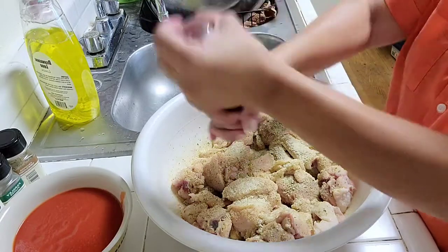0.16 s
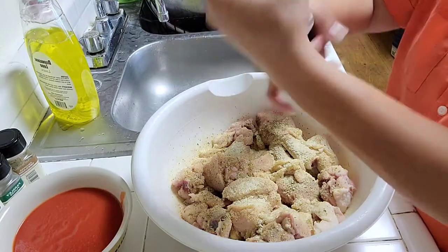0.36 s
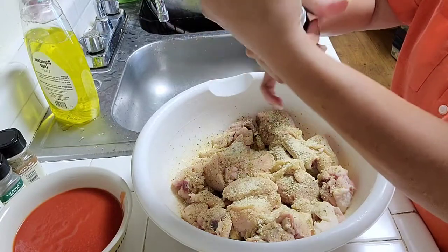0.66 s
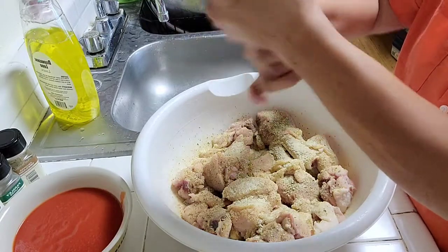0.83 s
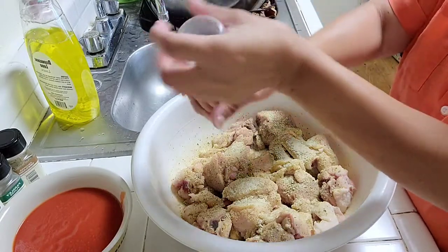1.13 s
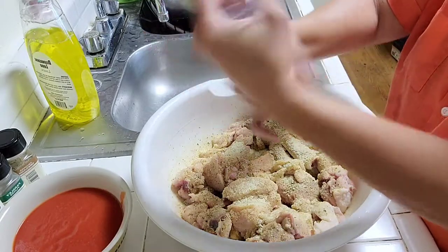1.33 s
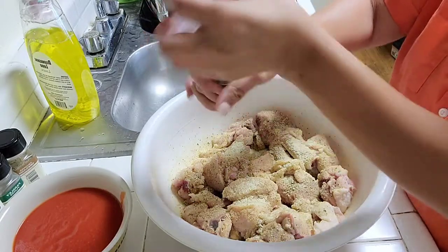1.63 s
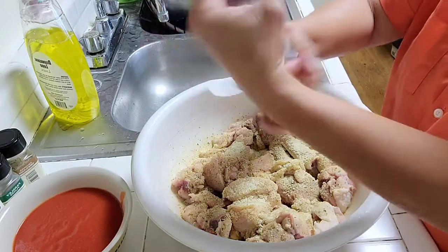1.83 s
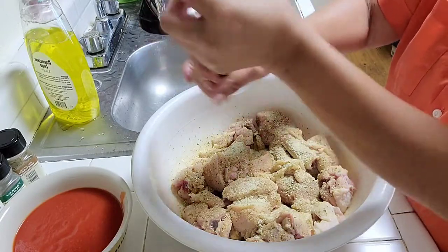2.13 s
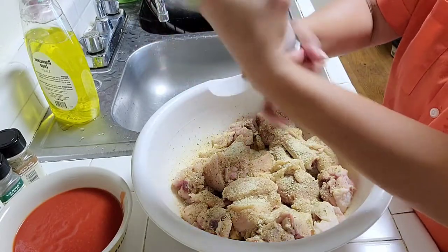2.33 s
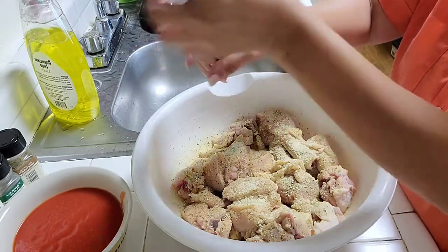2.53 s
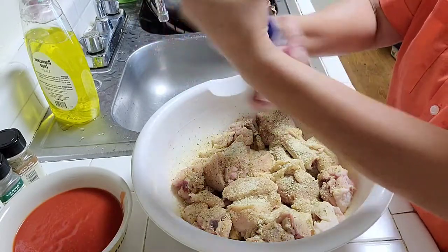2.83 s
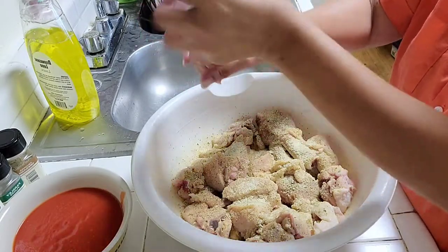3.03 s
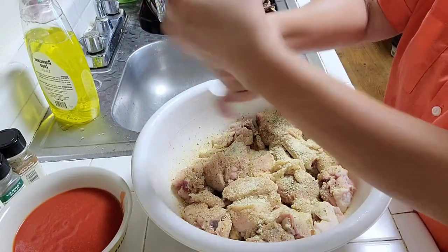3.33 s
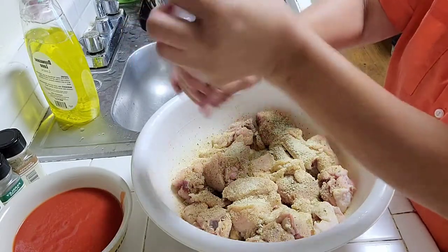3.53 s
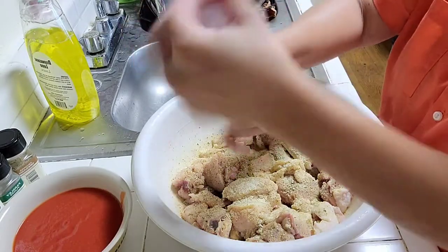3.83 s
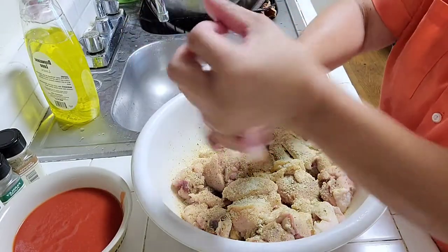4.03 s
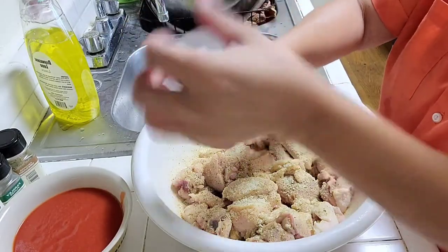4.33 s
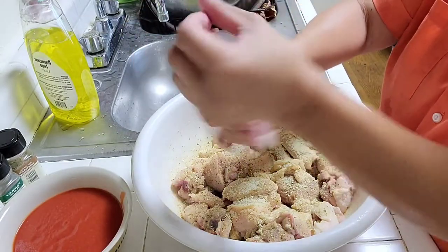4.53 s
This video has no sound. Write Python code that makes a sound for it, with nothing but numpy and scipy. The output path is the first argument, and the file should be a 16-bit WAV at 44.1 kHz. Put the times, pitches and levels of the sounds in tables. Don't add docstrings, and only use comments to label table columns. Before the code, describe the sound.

A palm taps an upturned plastic spice jar twice, then shakes it briskly, dry powder rattling and hissing over a faint fridge hum.

```python
import sys
import numpy as np
from scipy import signal
from scipy.fft import rfft, irfft, next_fast_len
from scipy.io import wavfile
from scipy.ndimage import uniform_filter1d

SR = 44100
rng = np.random.default_rng(int(sys.argv[2]) if len(sys.argv) > 2 else 0)


def volts_from_db(level):
    exponent = np.asarray(level, float) / 20
    return 10 ** exponent


def to_wav(s):
    ch = np.atleast_2d(s).T
    pcm = np.round(np.clip(ch, -1, 1) * 32767)
    wavfile.write(sys.argv[1], SR, pcm.astype(np.int16))


N = 205933

# f/Hz, level/dB
COMPRESSOR_LINES = [(59.5, -60), (119.1, -53), (238.8, -79.5)]
# f/Hz, width/Hz, level/dB
CABINET_MODES = [(28, 14, -81), (42, 33, -59), (62, 37, -55), (102.14, 8.1, -52.5), (110.3, 6.9, -57.5),
                 (120.23, 5.7, -63.5), (355, 34, -75), (420, 24, -78.5)]
# f/Hz, density/dB
AIR_SPECTRUM = [(82, -8), (140, -9.5), (171, -20), (254, -18.5), (1530, -28.5), (2890, -31), (5240, -46),
                (15000, -47)]
# t/s, peak/dB, f/Hz, t60/s
PALM_THUDS = [
    (0.131, -46.5, 258, 0.084),
    (0.984, -54, 282, 0.072),
    (2.244, -59, 200, 0.033),
    (2.44, -54.5, 535, 0.061),
    (2.728, -35, 355, 0.031),
    (3.364, -50, 350, 0.09),
    (3.615, -56, 633, 0.087),
    (4.092, -59, 250, 0.063),
    (4.302, -42.5, 230, 0.025),
]
# t/s, peak/dB, f/Hz
PALM_SLAPS = [(0.13, -24, 3350), (0.9823, 1, 4720), (1.3054, -15, 4700), (1.502, -24, 3000),
              (1.8229, -7.5, 3080), (1.9844, -38, 4070), (2.2428, -17, 3200), (2.4399, -18, 3300),
              (2.69, -19, 3980), (2.7606, -30, 4120), (2.8981, -11.5, 1980), (3.1684, -14.5, 1930),
              (3.2327, -8.5, 4790), (3.2531, -9, 1845), (3.3603, -18.5, 2000), (3.5099, -32, 7040),
              (3.62, -9, 3120), (3.8387, -80, 3000), (4.003, -15, 7200), (4.0967, -7, 3210),
              (4.1646, -7.5, 4000), (4.3061, -10, 1740), (4.4648, -33, 6360), (4.5819, -17, 1790),
              (4.612, -25, 3360)]
# t/s, flow/dB
SLIDE_FLOW = [(0.0, -67), (0.19, -76), (0.31, -66.5), (0.5, -74), (0.601, -86.5), (0.831, -78.5),
              (0.97, -78), (1.09, -58), (1.2, -70.5), (1.27, -59.5), (1.5, -54.5), (1.75, -52.5),
              (2.0, -52), (2.7, -49.5), (3.03, -52.5), (3.15, -48.5), (3.5, -50.5), (4.67, -50.5)]
# level/dB, swing/dB, loudest/share of shake
COARSE_SWELL = [(0.54, 5.5, 0.11), (-10, 13, 0.14)]
# level/dB, swing/dB, loudest/share of shake
FINE_SWELL = [(-0.7, 2.3, 1), (-3, 1.3, 0.48)]
# t/s, wall peak/dB, body re wall/dB, grit peak/dB, dust re grit/dB
TAP_SHOWERS = [(0.078, -75, -17, -49, 10), (0.11, -35.5, -18, -36, -3), (0.128, -13, -9.5, -19.5, -3),
               (0.138, -19, -24, -18, -0.5), (0.535, -66, -12, -59, -4), (0.85, -64, -12, -61, -4),
               (0.907, -51, -25, -42, 1), (0.9786, -13.5, -7, -16, -8), (0.9945, -14.5, -12, -20.5, -9),
               (1.093, -36.5, -25, -32.5, -19), (1.255, -32, -10, -33, -8)]
# t/s, wall peak/dB, body re wall/dB, grit peak/dB, dust re grit/dB
HEAP_LANDINGS = [(1.3023, -23.5, -11.5, -23, 1), (1.498, -28, -10.5, -35, -21),
                 (1.817, -24.5, -6, -30, -17), (1.9796, -26, -12, -36.5, -19),
                 (2.2397, -22, -7.5, -25.5, 1.5), (2.4378, -19.5, -6.5, -25, -5.5),
                 (2.6866, -17.5, -6, -20, 2.5), (2.701, -44, 8, -47, -14), (2.757, -19.5, -4.5, -23, -2.5),
                 (2.8933, -24, -6.5, -32, -18), (3.107, -31, -9, -31.5, -3), (3.161, -28, -7, -28.5, -11),
                 (3.2295, -20, -8.5, -28, -1), (3.357, -29, -2.5, -34.5, -20),
                 (3.6153, -22, -2.5, -22.5, 2), (3.628, -45, -12, -34, -16), (3.697, -27.5, -5, -31.5, -5),
                 (3.836, -28.5, -14.5, -34, -16), (4.094, -26, 1, -29.5, -18), (4.121, -21, -5, -28.5, -7),
                 (4.1638, -19, -2.5, -20.5, -12), (4.303, -24, -5.5, -24.5, -5.5),
                 (4.5797, -19.5, -5.5, -28.5, -3), (4.6102, -17.5, -4, -19.5, -4.5)]
# t/s, wall peak/dB, body re wall/dB, t60/s
LUMP_TUMBLES = [(0.17, -39, -5.5, 0.55), (0.345, -48, -20, 0.22), (1.03, -34, -9, .25),
                (2.46, -33.5, -9, 0.39), (3.19, -34, -5, .15), (0.776, -57.5, -6, .1),
                (1.354, -27.5, -4.5, 0.24), (1.376, -29.5, -6, 0.11), (1.738, -34, 1, 0.28),
                (1.794, -36.5, -15, .11), (2.077, -50, 1, .066), (2.191, -34, -7.5, 0.065),
                (2.3011, -22.5, -1.5, 0.11), (2.3236, -24.5, -6, 0.042), (2.622, -49, 5, 0.11),
                (2.783, -24.5, -3.5, 0.099), (3.147, -28.5, -1.3, .1), (3.247, -39, 6, 0.12),
                (3.672, -31, -3, 0.33), (4.2612, -32.5, -2, 0.077), (4.531, -41.5, 4, 0.49),
                (4.637, -22, -5, 0.38), (1.325, -31.5, -8, .2), (4.21, -48, -9, .2)]
# t/s, grit/dB, dust re grit/dB, length/s
POWDER_SIFTS = [(0.19, -46.5, 3, 0.049), (0.343, -45, 0, 0.087), (1.04, -59, -19, 0.027),
                (1.328, -40.5, -22, 0.085), (1.436, -38.5, -9, .012), (1.516, -27, -1.5, 0.0092),
                (1.559, -32.5, 0, 0.029), (1.644, -34, 0, .045), (1.73, -38, -1, 0.019),
                (1.855, -46, -14, 0.064), (2.005, -32, -6, 0.01), (2.04, -37, 0, 0.042),
                (2.125, -30, -5, 0.0069), (2.281, -32.5, -11, 0.041), (2.449, -30.5, -1, 0.024),
                (2.589, -33.5, 5.5, 0.023), (2.925, -32, -1, 0.041), (3.048, -33, -3, .04),
                (3.217, -32, .1, .012), (3.277, -41, 6, .012), (3.38, -31.5, -5, .02),
                (3.399, -30, -1, 0.058), (3.507, -30, -1.5, 0.044), (3.749, -36, 3.5, 0.027),
                (3.861, -31.5, 0, 0.064), (3.977, -33.5, 6, .014), (4, -28.5, 8.5, .004),
                (4.325, -33.5, -2, .03), (4.372, -32.5, 2, 0.024), (4.462, -30, 3.5, 0.023)]
# f/Hz, width/Hz, level/dB
BODY_MODES = [(690, 750, -23), (752, 70, -11), (1017, 99, -10.5), (1199, 47, -3.5), (1291, 280, -11.5),
              (1812, 228, -2), (1887, 72, 7), (2060, 320, -7.5)]
# f/Hz, width/Hz, level/dB
WALL_MODES = [(2895, 780, -10), (2908, 47, -5.5), (3200, 280, -4), (3638, 208, -3.5), (3970, 460, -4),
              (4510, 340, -3), (4630, 355, -2.5)]
# f/Hz, density/dB
GRIT_SPECTRUM = [(3000, -24.5), (4600, -2), (5300, -1.5), (6800, 1), (8300, -1.5), (9500, -6.5),
                 (12000, -14)]
# f/Hz, density/dB
DUST_SPECTRUM = [(6500, -46.5), (8500, -15.5), (9500, -6.5), (11500, 0.2), (13000, -4.5), (15000, -7),
                 (16400, 0)]

SHAKE_START_S, SHAKE_PERIOD_S = 1.306, 0.465
HUSH_DB, HUSH_SHARE, HUSH_S = -2.5, 0.355, 0.039
SHOWER_LATE_S, POWDER_LATE_S = 0.0008, 0.0015
COARSE_RISE_S, FINE_RISE_S = 0.0011, 0.0019
COARSE_HOLD_S, FINE_HOLD_S = 0.0058, 0.0053
TAP_T60_S, LANDING_T60_S = (0.099, 0.042), (0.14, 0.061)
LINGER = 0.39
SIFT_WALL_DB, SIFT_BODY_DB, SIFT_T60_S = -7, -59, 0.087


def level(x, rms_db):
    return x * volts_from_db(rms_db) / np.sqrt(np.mean(x ** 2))


def colour(x, spectrum):
    hz, db = np.transpose(spectrum)
    size = next_fast_len(N)
    f_hz = np.maximum(np.fft.rfftfreq(size, 1 / SR), 1)
    gain = volts_from_db(np.interp(np.log(f_hz), np.log(hz), db))
    return irfft(rfft(x, size) * gain, size)[..., :N]


def ring(x, hz, width_hz):
    return signal.lfilter(*signal.iirpeak(hz, hz / width_hz, SR), x)


def walk(rate_hz):
    hold = int(SR / rate_hz)
    return uniform_filter1d(np.repeat(rng.standard_normal(N // hold + 1), hold), hold)[:N]


def stereo_noise(alike):
    mid, side = rng.standard_normal((2, N))
    a = np.clip(alike, 0, 1)
    return np.sqrt(1 + a) * mid + np.sqrt(1 - a) * side * np.array([[1], [-1]])


def kitchen():
    low_pass = signal.butter(1, 800, fs=SR, output="sos")
    high_pass = signal.butter(1, 800, "high", fs=SR, output="sos")
    low = signal.sosfilt(low_pass, stereo_noise(0.75))
    high = signal.sosfilt(high_pass, stereo_noise(0))
    return level(colour(low + high, AIR_SPECTRUM), -60.5)


def fridge():
    t_s = np.arange(N) / SR
    out = np.zeros((2, N))
    for hz, db in COMPRESSOR_LINES:
        line = np.sin(2 * np.pi * (hz * t_s + rng.random()))
        out += np.sqrt(2) * volts_from_db(db + walk(26.0)) * line
    for hz, width_hz, db in CABINET_MODES:
        rumble = ring(ring(stereo_noise(0.99), hz, width_hz), hz, width_hz)
        out += level(rumble, db)
    return out * volts_from_db(np.array([[0.9], [-0.9]]))


def palm():
    out, u_s = np.zeros(N + SR), np.arange(SR // 4) / SR
    for start_s, db, hz, t60_s in PALM_THUDS:
        blow = np.sin(2 * np.pi * hz * u_s) + 0.26 * np.sin(2 * np.pi * 0.98 * hz * u_s)
        envelope = (1 - np.exp(-u_s / 0.00036)) * 1000. ** (-u_s / t60_s)
        out[int(start_s * SR):][:len(u_s)] += volts_from_db(db - 1.5) * blow * envelope
    return out[:N]


def slaps(snap_t60_s, ring_t60_s, lag_samples):
    out, u_s = np.zeros(N + SR), np.arange(SR // 40) / SR
    snaps = np.diff(rng.standard_normal((len(PALM_SLAPS), len(u_s) + 1)))
    for (start_s, db, hz), snap in zip(PALM_SLAPS, snaps):
        crack = 0.32 * snap * 1000. ** (-u_s / snap_t60_s)
        crack += 1.69 * np.sin(2 * np.pi * hz * u_s) * 1000. ** (-u_s / ring_t60_s)
        out[int(start_s * SR):][:len(u_s)] += volts_from_db(db - 12) * crack * (1 - np.exp(-u_s / 0.00013))
    return np.array([out[:N], volts_from_db(-2.5) * np.roll(out, int(lag_samples))[:N]])


def grains(per_s, scatter_db, shared, lag_samples):
    hit = rng.random((3, N)) < per_s / SR
    size_db = scatter_db * np.minimum(rng.exponential(size=(3, N)), 4)
    ticks = hit * rng.standard_normal((3, N)) * volts_from_db(size_db)
    both = np.array([ticks[2], np.roll(ticks[2], int(lag_samples))])
    return level(ticks[:2] + shared * both, 0)


def patchy(x, patchy_db, bins, frames):
    z = signal.stft(x, nperseg=512)[2]
    patches = uniform_filter1d(rng.standard_normal(z.shape), bins, axis=1)
    patches = uniform_filter1d(patches, frames, axis=2)
    patched = z * volts_from_db(patchy_db * patches / patches.std())
    return level(signal.istft(patched, nperseg=512)[1][:, :N], 0)


def linger(t60_s, db, full_db):
    return t60_s * volts_from_db(LINGER * np.clip(full_db - db, -8, 14))


def lumps():
    showers = []
    for rows, t60_s in ((TAP_SHOWERS, TAP_T60_S), (HEAP_LANDINGS, LANDING_T60_S)):
        for s, db, body_db, _, _ in rows:
            showers.append((s, db, body_db, COARSE_HOLD_S, linger(t60_s[0], db, -27)))
    for s, db, body_db, t60_s in LUMP_TUMBLES:
        showers.append((s, db, body_db, COARSE_HOLD_S, t60_s))
    for s, db, _, length_s in POWDER_SIFTS:
        showers.append((s, db + SIFT_WALL_DB, SIFT_BODY_DB, length_s, SIFT_T60_S))
    return showers


def powder():
    showers = [(*sift, SIFT_T60_S) for sift in POWDER_SIFTS]
    for rows, t60_s in ((TAP_SHOWERS, TAP_T60_S), (HEAP_LANDINGS, LANDING_T60_S)):
        for s, _, _, db, dust_db in rows:
            showers.append((s + POWDER_LATE_S, db, dust_db, FINE_HOLD_S, linger(t60_s[1], db, -19.5)))
    return showers


def flow(showers, layers, rise_s, crest_db, first_db, first_s, soft, lead_db):
    t_s = np.arange(N) / SR
    shake = (t_s - SHAKE_START_S) / SHAKE_PERIOD_S
    shaking = shake > 0
    swell_db = [db + swing_db * np.cos(2 * np.pi * (shake - share)) * shaking
                for db, swing_db, share in layers]
    from_hush_s = (shake % 1 - HUSH_SHARE) * SHAKE_PERIOD_S
    hush_db = HUSH_DB * np.exp(-(from_hush_s / HUSH_S) ** 2) * shaking
    slide_db = np.interp(t_s, *np.array(SLIDE_FLOW).T)
    power = volts_from_db(2 * (slide_db + swell_db + hush_db))
    for start_s, db, other_db, hold_s, t60_s in showers:
        near = slice(int((start_s - 0.05) * SR), int((start_s + 0.4) * SR))
        u_s = t_s[near] - start_s - SHOWER_LATE_S
        slow = volts_from_db(soft * max(-24 - db, 0))
        shower = 1000. ** (-2 * np.maximum(u_s - hold_s - rise_s * slow, 0) / max(t60_s, 0.01))
        front = volts_from_db(2 * first_db) * np.exp(-np.abs(u_s) / first_s) / slow
        onset = 1 - np.exp(-np.maximum(u_s, 0) / max(rise_s * slow, 0.0002))
        ahead = volts_from_db(2 * lead_db) * np.exp(-np.abs(u_s) / 0.0042)
        peak_db = db + crest_db + np.array([[0], [other_db]])
        power[:, near] += volts_from_db(2 * peak_db) * (onset * (shower + front) + ahead)
    return np.sqrt(power)


def jar():
    wall, body = flow(lumps(), COARSE_SWELL, COARSE_RISE_S, crest_db=-12, first_db=7, first_s=0.0025,
                      soft=0.26, lead_db=-14.5)
    grit, dust = flow(powder(), FINE_SWELL, FINE_RISE_S, crest_db=-12, first_db=8, first_s=0.0029,
                      soft=0.81, lead_db=-13)
    coarse = grains(per_s=7000, scatter_db=3.5, shared=1.0, lag_samples=4)
    coarse = patchy(coarse, patchy_db=4.5, bins=2, frames=3)
    fine = grains(per_s=14000, scatter_db=3.0, shared=0.38, lag_samples=4.3)
    fine = patchy(fine, patchy_db=2.2, bins=2, frames=2)
    out = 0
    for strength, modes, layer_db in ((body, BODY_MODES, 2.5), (wall, WALL_MODES, 2.6)):
        for k, (hz, width_hz, db) in enumerate(modes):
            heap = volts_from_db(2.2 * walk(30) + walk(150))
            rung = ring(ring(coarse * strength * heap, hz, 1.13 * width_hz), hz, 3 * width_hz)
            out = out + (-1) ** k * volts_from_db(db + layer_db + 11) * rung
    for strength, spectrum, layer_db in ((grit, GRIT_SPECTRUM, 2.7), (dust, DUST_SPECTRUM, 2.8)):
        clumps = volts_from_db(0.46 * walk(45) + 1.5 * walk(200))
        ticks = colour(fine * strength * clumps, spectrum)
        out = out + volts_from_db(layer_db) * ticks / np.std(colour(fine, spectrum))
    return out * volts_from_db(np.array([[1.4], [-1.4]]))


def room(near):
    u_s = np.arange(SR // 2) / SR
    tail = rng.standard_normal((2, len(u_s))) * 1000. ** (-u_s / 0.16) * (u_s > 0.003)
    tail = tail / np.sqrt(np.sum(tail ** 2, axis=1, keepdims=True))
    return volts_from_db(-5.5) * signal.fftconvolve(near, tail, axes=1)[:, :N]


def scene():
    near = jar() + slaps(snap_t60_s=0.0074, ring_t60_s=0.013, lag_samples=6.1) + palm()
    return near + room(near) + fridge() + kitchen()


def roll_off(x):
    return signal.sosfilt(signal.butter(12, 16460, fs=SR, output="sos"), x)


def record(dry):
    def below(hz):
        return signal.sosfiltfilt(signal.ellip(12, 0.1, 80, hz, fs=SR, output="sos"), dry)
    kept = below(15550)
    top = volts_from_db(-40) * (below(16300) - kept)
    return roll_off(kept + top)


dry = scene()
out = record(dry)
to_wav(out)
```